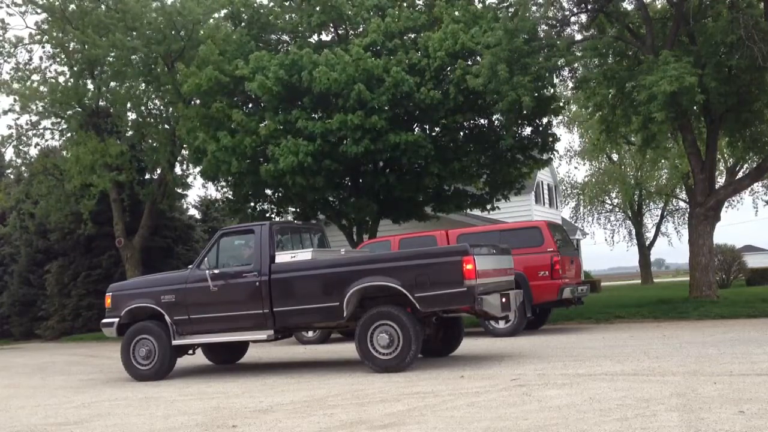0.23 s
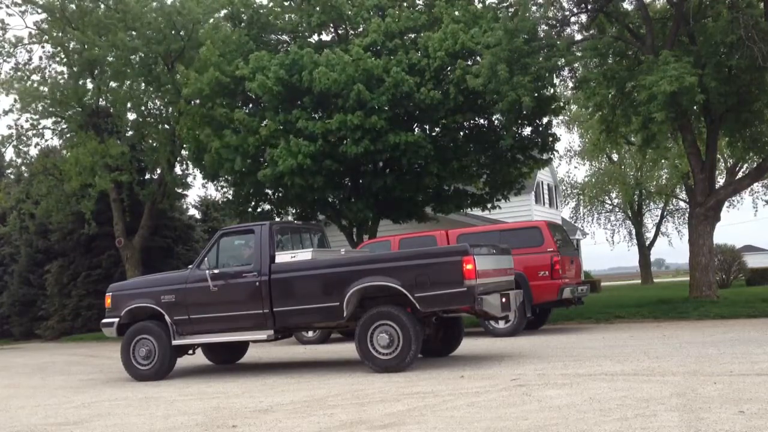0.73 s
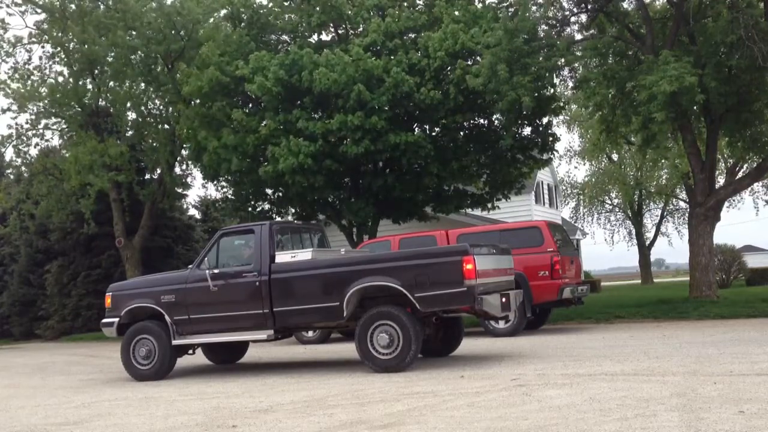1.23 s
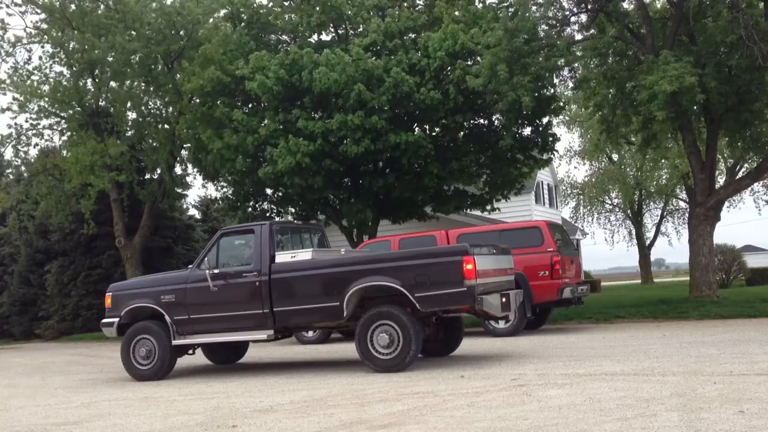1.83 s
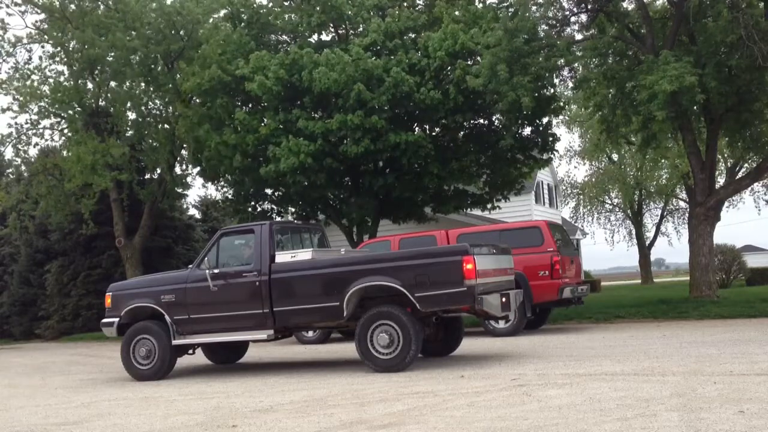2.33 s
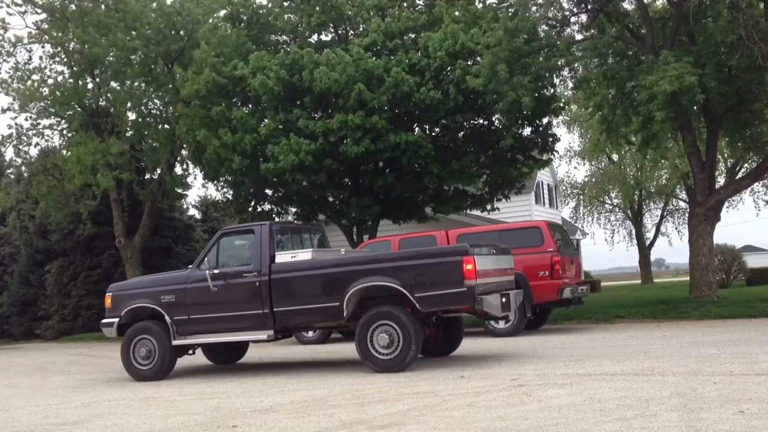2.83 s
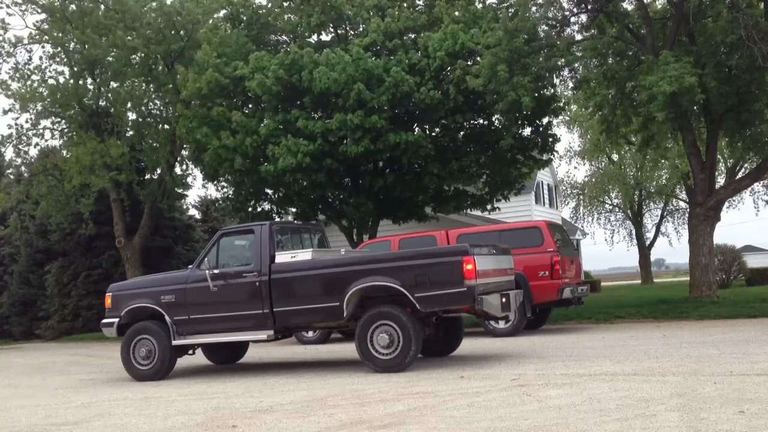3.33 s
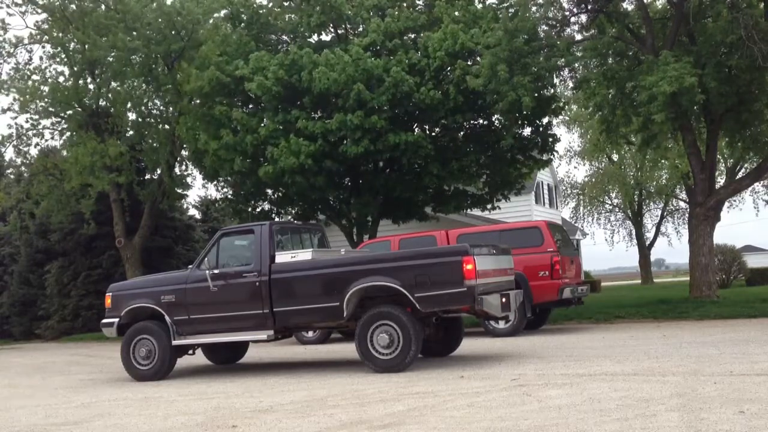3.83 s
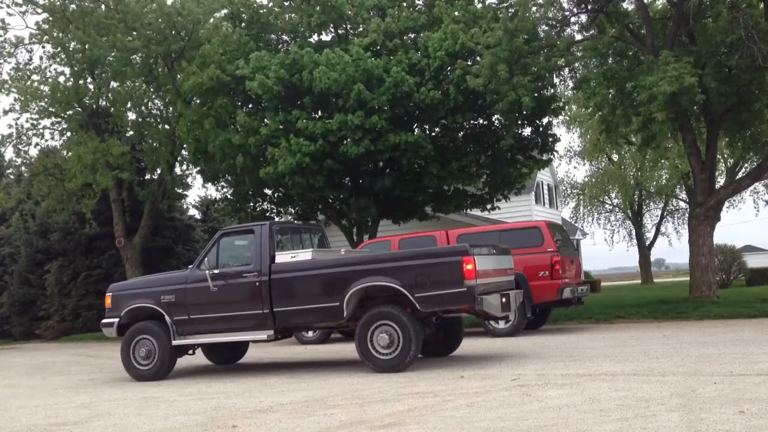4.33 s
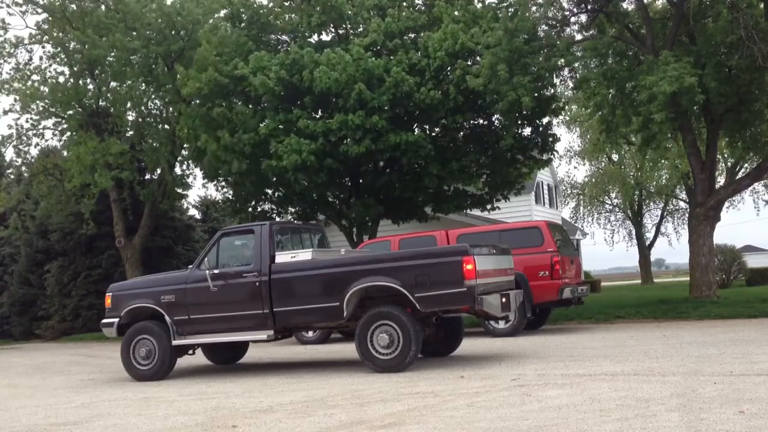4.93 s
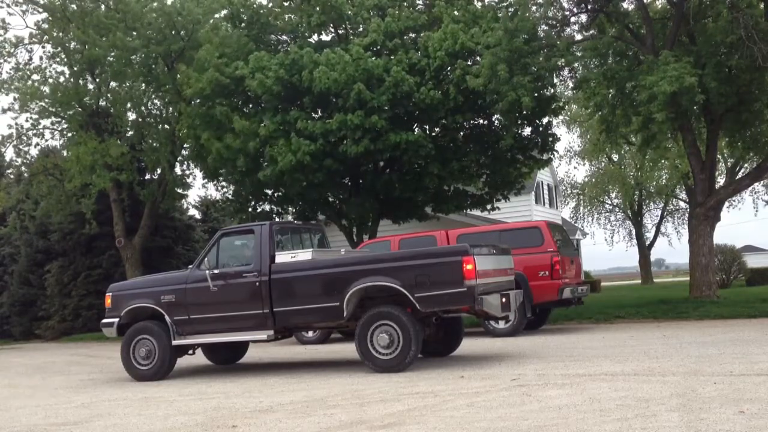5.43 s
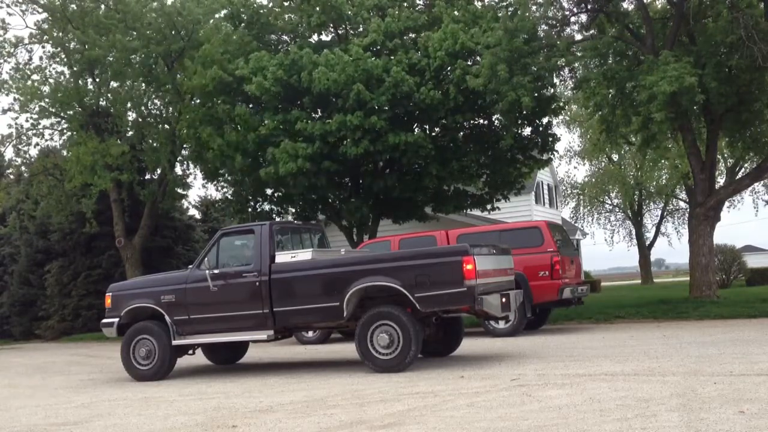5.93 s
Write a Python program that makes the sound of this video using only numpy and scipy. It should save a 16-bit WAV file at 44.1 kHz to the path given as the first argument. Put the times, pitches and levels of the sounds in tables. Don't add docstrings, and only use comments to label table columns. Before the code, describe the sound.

A parked petrol V8 with open twin straight pipes, outdoors in a farm yard. At 0 s it turns slowly and unevenly, lumpy thuds with faint metal flecks. Revs and loudness climb steadily, heavy thuds punching through around 1.4 to 2 s as separate blows merge into a wavering drone. At 2.4 s hard firings become sharp cracks and bright rasp, peaking near 2.6 s. The throttle snaps shut: dense machine-gun rattle and bright spits until about 3.3 s, then sparser pops and thuds while pitch falls. From 4.5 to 5.5 s it settles to a quiet, lumpy idle with fan hiss, valve ticks and loose metal. At 5.5 s an abrupt blip cracks and barks, dips near 6 s, and another hits at 6.1 s, cut off mid-rev. Short echoes from buildings and trees, slight breeze rumble, thin bass, limited peaks.

```python
import sys
import numpy as np
from scipy import signal
from scipy.fft import rfft, irfft, next_fast_len
from scipy.io import wavfile
from scipy.ndimage import uniform_filter1d, map_coordinates

SR = 44100
rng = np.random.default_rng(int(sys.argv[2]) if len(sys.argv) > 2 else 0)


def makeup_ratio(level_db):
    decades = np.asarray(level_db, float) / 20
    return 10 ** decades


def file_out(sig):
    cols = np.atleast_2d(sig).T
    lim = np.clip(cols, -1, 1)
    pcm = np.round(lim * 32767).astype(np.int16)
    wavfile.write(sys.argv[1], SR, pcm)


N = 273420

# (time [s], gas flow as bark level [dB], harshness as rasp level [dB])
EFFORT = [(0, -28, -43.5), (0.62, -19.5, -40), (1.35, -14, -35), (2.32, -14, -32), (2.42, -15, -23),
          (2.57, -15.5, -22.5), (2.63, -21, -25.5), (2.83, -19, -23.5), (2.95, -22.5, -31), (3.4, -21, -29),
          (3.7, -20.5, -37.5), (4.25, -19, -39), (5.5, -30, -45.5), (5.62, -17.5, -21.5),
          (5.87, -16.5, -27.5), (6.0, -27.5, -46), (6.11, -15, -40), (6.165, -11, -23)]
# (time [s], engine cycles per second [1/s])
SPEED = [(0, 8.52), (.47, 9.63), (1.33, 14.4), (1.81, 17.5), (2.23, 19.9), (2.42, 22.4), (2.59, 26.6),
         (2.73, 26.2), (3.04, 23.1), (3.32, 20.7), (3.83, 16), (4.49, 11.2), (5.45, 8), (5.6, 13),
         (5.7, 15.2), (5.86, 20.3), (6.08, 17.8), (6.2, 19.1)]
# (time [s], uneven burning [0-1], throttle [0-1])
BURN = [(0, .6, .7), (.5, .45, 1), (1.1, .25, 1), (2.1, .2, 1), (2.55, .25, 1), (2.65, .28, 0),
        (3.6, .38, 0), (4.4, .6, .2), (5.5, .7, .4), (5.6, .55, 1), (6.2, .5, 1)]
# (place in the firing order [0-7], level [dB])
NEAR_BANK = [(0, 2.5), (2, -2), (3, 0), (5, -3)]
# (frequency [Hz], width [Hz], level [dB])
COASTING = [(113, 82, -7), (165, 34.4, 5), (216, 105, 1), (299, 91, 0.5), (466.4, 46, -3.5)]
# (frequency [Hz], width [Hz], level [dB])
UPPER = [(558, 36.6, 5), (600, 23, 5), (656, 20.4, 5), (839.6, 53, 1.5), (1065, 33.5, -2), (1248, 61, -9),
         (1520, 230, -15.5)]
MID_HARSH_DB = -33
DULL_HZ = 2500


def unit(x):
    return x / np.sqrt(np.mean(x ** 2) + 1e-20)


def steady(x, span_s):
    return x / np.sqrt(np.abs(uniform_filter1d(x ** 2, int(span_s * SR))) + 1e-12)


def along(points, hz):
    f, v = np.transpose(points)
    return np.interp(np.log(hz + 1), np.log(f + 1), v)


def curves(rows):
    s, *cols = np.transpose(rows)
    return [np.interp(np.arange(N) / SR, s, c) for c in cols]


def filtered(x, response):
    m = next_fast_len(N + SR // 2)
    return irfft(rfft(x, m) * response(np.fft.rfftfreq(m, 1 / SR)), m)[:N]


def modes(table):
    def response(f):
        total = 0
        for k, (c, w, db) in enumerate(table):
            total = total + (-1) ** k * makeup_ratio(db) * 1j * f * w / (c * c - f * f + 1j * f * w)
        return total
    return response


def duller(top_hz):
    return lambda hz: 1 / (1 + 1j * hz / top_hz) ** 2


def wobble(rate):
    knots = rng.standard_normal(int(N * rate / SR) + 4)
    return map_coordinates(knots, [np.arange(N) * rate / SR])


def firings(bank, lag_s, scatter_db, jitter_s):
    cycles = np.cumsum(curves(SPEED)[0]) / SR
    now = np.arange(N)
    place, db = np.transpose(bank)
    turn = (np.arange(160)[:, None] + np.round(place) / 8).ravel()
    luck = rng.standard_normal((len(turn), 2))
    at = np.interp(turn + 0.0663, cycles, now, right=N - 1)
    rough = np.clip(np.interp(at, now, curves(BURN)[0]), 0, 1)
    at = np.clip(at + SR * (lag_s + jitter_s * rough * luck[:, 0]), 0, N - 1).astype(int)
    size = makeup_ratio(np.tile(db, len(turn) // len(db)) + scatter_db * rough * luck[:, 1])
    size = size * (turn < cycles[-1] - .06)
    return np.bincount(at, size, N)


def exhaust():
    # (place in the firing order [0-7], level [dB])
    far_bank = [(1, -7), (4, -3), (6, -6), (7, -4)]
    # (frequency [Hz], width [Hz], level [dB])
    loaded = [(121.5, 16, -8), (157, 39.7, 1.5), (195.6, 55, 1), (305, 69, -5), (451.5, 46.5, -7.5)]
    # (frequency [Hz], width [Hz], level [dB])
    idling = [(146.3, 62, -2), (228, 82, -2.5), (318, 33, -5.5), (447, 39.5, -10.5)]
    # (frequency [Hz], level per Hz [dB])
    jet_colour = [(760, 4.5), (1300, 0), (1760, -5.5), (2010, -1), (2190, -1), (3670, 0.5), (5390, -9.5),
                  (6440, -9), (8000, -19.5), (10600, -29), (12500, -25), (14600, -72), (15600, -71)]
    # (frequency [Hz], width [Hz], level [dB])
    tip = [(2000, 20, -18), (1980, 22, 1), (2740, 8.3, -24), (2890, 11, 10), (3350, 13, -24),
           (3860, 38, -15), (4150, 38, -5), (5360, 22, -4)]
    bark_db, rasp_db = curves(EFFORT)
    uneven, throttle = curves(BURN)
    speed = curves(SPEED)[0]
    idle = np.clip((15.5 - speed) / 6, 0, 1)

    upper_db = -28.5 + 0.63 * (bark_db + 16) + 0.21 * (rasp_db - MID_HARSH_DB) + 1.5 * wobble(9)
    upper_db = upper_db + np.minimum(speed - 15, 0)

    near = firings(NEAR_BANK, lag_s=0, scatter_db=5, jitter_s=.0013)
    far = firings(far_bank, lag_s=.0025, scatter_db=5, jitter_s=.0013)
    blows = near + far
    t = np.arange(SR // 8) / SR
    puff = signal.fftconvolve(blows, makeup_ratio(-60 * t / 0.11) - makeup_ratio(-60 * t / 0.012))[:N]

    def swirl():
        return steady(puff * rng.standard_normal(N), 0.17)

    def pipe(x):
        revving = throttle * filtered(x, modes(loaded)) + (1 - throttle) * filtered(x, modes(COASTING))
        return steady((1 - idle) * revving + idle * filtered(x, modes(idling)), 0.23)

    soft = filtered(blows, lambda hz: 1 / (1 + 1j * hz / 450))
    locked_share = .65
    bark = (1 - locked_share * (1 - idle)) * pipe(soft) + uneven * pipe(swirl())
    upper = 0.22 * steady(filtered(blows, modes(UPPER)), 0.18) + 3.6 * unit(filtered(swirl(), modes(UPPER)))

    jet = swirl() + 0.4 * rng.standard_normal(N)
    jet = filtered(jet, lambda hz: makeup_ratio(along(jet_colour, hz)) * (1 + modes(tip)(hz)))
    lucky = blows * makeup_ratio(3.5 * rng.exponential(size=N))
    bright = signal.butter(2, [6000, 14000], "band", fs=SR, output="sos")
    snap = steady(signal.sosfilt(bright, lucky), .3)
    jet = unit(jet) + .02 * throttle * (1 - idle) * snap

    lope_db = 1.1 * wobble(11)
    locked_db = -3.5 * throttle * (1 - idle) * (1 - uneven)
    out = makeup_ratio(bark_db + 2.1 + lope_db + locked_db) * steady(bark, 0.14)
    out = out + makeup_ratio(upper_db - 1.5) * steady(upper, 0.42)
    return out + makeup_ratio(rasp_db + 1.0 + 1.37 * wobble(17)) * jet


def orders():
    orders_loaded = (5, 7, 8, 9, 10, 11, 12, 13, 14, 15, 16)
    orders_coasting = (5, 6, 8, 9, 11, 13)
    # (level elsewhere [dB], best speed [1/s], range [1/s], gain there [dB])
    suits_loaded = [(-8, 24.5, 3, 4), (-14, 21, 3, 4), (-4, 20.4, .8, 6), (-7, 24, 2.6, 14), (-9, 18, 4, 1),
                    (-8, 18.6, 1.3, 9), (-12, 25, 2, 18), (-8, 15.7, 1.5, 14.5), (-12, 18.4, 1, 11),
                    (-13, 15, 1.5, 7), (-4, 18.8, 1.5, 11)]
    # (level elsewhere [dB], best speed [1/s], range [1/s], gain there [dB])
    suits_coasting = [(-8, 24, 2.5, 9), (-11, 19.5, 2.2, 12), (-2, 14.5, 2, 6), (-8, 26.3, 1.2, 10),
                      (-9, 16, 2.5, 4), (-13, 14, 2.2, 6)]
    # (frequency [Hz], level over the bark [dB])
    drone = [(45, -48), (90, -21), (125, -6.5), (160, -2), (200, -1.5), (240, -3), (290, -12), (350, -16)]
    speed = curves(SPEED)[0]
    uneven, throttle = curves(BURN)
    angle = 2 * np.pi * np.cumsum(speed) / SR
    base_db = curves(EFFORT)[0] - 11 * uneven

    def tone(k, db):
        level = np.sqrt(2) * makeup_ratio(db + 1.8 * wobble(10))
        return level * np.sin(k * angle + .25 * wobble(9) + rng.uniform(0, 2 * np.pi))

    def stack(multiples, suits):
        total = 0
        for k, (db, best, spread, gain_db) in zip(multiples, suits):
            suited_db = gain_db * np.exp(-((speed - best) / spread) ** 2)
            total = total + tone(k, base_db + db + suited_db + along(drone, k * speed))
        return total

    return throttle * stack(orders_loaded, suits_loaded) + (1 - throttle) * stack(orders_coasting, suits_coasting)


def engine_bay():
    # (frequency [Hz], level per Hz [dB])
    bay_colour = [(710, 9), (1200, -30), (1860, -9), (2280, -2), (3860, -2.5), (4250, 1.5), (6670, -1.5),
                  (11600, -18.5), (12600, -22), (14400, -31), (15600, -40)]
    hiss = unit(filtered(rng.standard_normal(N), lambda hz: makeup_ratio(along(bay_colour, hz))))
    fan = makeup_ratio(-42)
    leaks = makeup_ratio(-50 + 2.36 * (curves(EFFORT)[1] - MID_HARSH_DB))
    fade = makeup_ratio(-60 * np.arange(SR // 10) / SR / 0.046)
    ticks = signal.fftconvolve(firings(NEAR_BANK, lag_s=0, scatter_db=6, jitter_s=.002), fade)[:N]
    ticks = steady(ticks * rng.standard_normal(N), 0.57)
    metal = modes([(6700, 5000, 0)])
    valves = unit(filtered(ticks, lambda hz: metal(hz) / (1 + (hz / 11000) ** 8)))
    throb = makeup_ratio(0.28 * wobble(3.24) + 1.8 * wobble(5.7))
    return np.hypot(fan, leaks) * throb * hiss + makeup_ratio(-49 - 11 * curves(BURN)[1]) * valves


def thuds():
    # (time [s], peak level [dB], centre frequency [Hz])
    heavy = [(0.088, -16, 188), (0.248, -12, 221), (0.302, -12, 180), (0.331, -10, 183), (0.429, -13, 205),
             (0.511, -11, 213), (0.607, -6, 191), (0.67, -9, 191), (0.723, -11, 218), (0.761, -8, 288),
             (0.884, -7, 205), (0.968, -5, 210), (1.083, -7, 170), (1.176, -5, 183), (1.213, -9, 191),
             (1.406, -1, 188), (1.699, -6, 229), (1.899, -3, 205), (1.949, -3, 307), (1.999, -3, 202),
             (3.011, -9, 256), (3.029, -11, 425), (3.057, -9, 266), (3.098, -7, 188), (3.236, -9, 436),
             (3.259, -7, 460), (3.284, -6, 172), (3.309, -6, 301), (3.335, -6, 293), (3.356, -8, 439),
             (3.458, -10, 175), (3.489, -11, 151), (3.595, -5, 215), (3.734, -8, 194), (3.851, -11, 210),
             (3.928, -8, 188), (3.958, -6, 275), (4.095, -9, 161), (4.165, -6, 202), (4.256, -11, 188),
             (4.419, -11, 170), (4.546, -14, 207), (4.673, -10, 218), (4.721, -14, 266), (4.865, -14, 240),
             (5.657, -4, 250), (5.769, -5, 207), (5.897, -8, 213), (6.03, -12, 234), (6.113, -4, 178),
             (0.568, -11, 167), (2.599, -6, 215), (4.364, -13, 218), (4.836, -16, 161), (5.609, -8, 148)]
    out, bites = np.zeros(N + SR), np.zeros(N)
    t = np.arange(SR // 16) / SR
    for s, db, hz in heavy:
        at = round(s * SR)
        angle = 2 * np.pi * hz * t * (0.952 + 8 * t)
        swing = np.sin(angle) + makeup_ratio(-9) * np.sin(rng.uniform(1.6, 2.5) * angle)
        fade = makeup_ratio(db - 2 - 60 * t * hz / 7)
        out[at:][:len(t)] += fade * (1 - np.exp(-t / 0.0005)) * swing
        bites[at] = makeup_ratio(db + 3)
    return out[:N] + filtered(filtered(bites, modes(UPPER)), duller(DULL_HZ))


def shocks():
    # (time [s], peak level [dB], centre frequency [Hz])
    flecks_early = [(0.115, -23, 3370), (0.203, -25, 3340), (0.254, -24, 2730), (0.2855, -17.5, 4700),
                    (0.302, -23, 3270), (0.3324, -23, 2820), (0.376, -17, 3280), (0.406, -19, 2850),
                    (0.485, -30, 2950), (0.5106, -19, 2260), (0.5862, -31, 3400), (0.6094, -24, 2300)]
    # (time [s], peak level [dB], centre frequency [Hz])
    hard = [(2.3993, -6, 2690), (2.4209, -2.5, 3700), (2.4703, -4, 3770), (2.4962, -1.5, 3820),
            (2.5122, 3, 3370), (2.5524, 4, 3150), (2.589, 0.5, 3650), (2.6334, 0, 3800),
            (2.6912, -4.5, 2840), (2.7059, -4, 3650), (5.5283, -21, 2070), (5.5493, -9, 3380),
            (5.5774, 2.5, 4600), (5.6076, -10, 3100), (5.6195, 0.5, 2800), (5.6785, 4, 3040),
            (5.7074, -4, 3080), (5.737, -2, 3320), (5.7538, 0, 2970), (5.8057, 0.5, 3700),
            (5.843, -1.5, 6000), (5.8666, -0.5, 3820), (6.13, -5, 2900), (6.149, 3.5, 3700),
            (6.186, 0.5, 3120)]
    # (time [s], peak level [dB], centre frequency [Hz])
    rattle = [(2.7214, -5, 3740), (2.7302, -4, 3800), (2.7584, -11, 2150), (2.768, 2.5, 4200),
              (2.7824, -19, 3470), (2.7977, -11, 3650), (2.8074, 1, 3900), (2.822, -18, 3410),
              (2.847, 0, 4300), (2.861, -9, 3500), (2.8778, -10, 4430), (2.8866, -4.5, 3250),
              (2.928, -2.5, 4000), (2.9441, -5, 3590), (2.97, 1.5, 4000), (2.9861, -7, 3500),
              (3.0131, -3.5, 3750), (3.03, -10, 4720), (3.056, -3, 2520), (3.072, -13, 1970),
              (3.1003, -0.5, 3900), (3.116, -1.5, 4530), (3.1448, -0.5, 3120), (3.161, -4, 6500),
              (3.1724, -6, 2570), (3.1888, -1, 2500), (3.2055, -6.5, 2620), (3.2178, -10, 3740),
              (3.237, -5.5, 3430), (3.2534, -6, 3530), (3.2834, -7, 3130), (3.3009, -10, 3570),
              (3.3797, -32, 3670), (3.438, -33, 4080)]
    # (time [s], peak level [dB], centre frequency [Hz])
    pops = [(3.3237, -5.5, 4030), (3.357, -2.5, 3980), (3.4073, -10, 2600), (3.458, -2, 3800),
            (3.49, -8, 3900), (3.509, -11, 2330), (3.598, -13, 2460), (3.6183, -13, 3950),
            (3.6548, -11, 2300), (3.734, -12.5, 6300), (3.308, -6.5, 2000), (3.96, -18.5, 3050),
            (3.987, -14, 4080), (4.072, -15.5, 3950), (4.143, -14.5, 4200), (4.218, -13.5, 4100),
            (4.3768, -12, 4100), (4.55, -13, 4100), (5.0776, -22, 4100)]
    # (time [s], peak level [dB], centre frequency [Hz])
    flecks_late = [(4.586, -22, 6780), (4.6407, -24.5, 4200), (4.6767, -41, 4550), (4.715, -23.5, 3870),
                   (4.7794, -25, 4440), (4.8133, -28, 3870), (4.8498, -29, 5560), (4.9213, -19.5, 6740),
                   (5.005, -24, 6550), (5.036, -25, 6160), (5.0727, -19, 3870), (5.126, -28, 4300),
                   (5.171, -28, 3170), (5.2545, -29, 3180), (5.2948, -24, 6800), (5.342, -26, 4120)]
    rattle = np.add(rattle, [0, -0.5, 0])
    cycles, t = np.cumsum(curves(SPEED)[0]) / SR, np.arange(N) / SR
    count = int(cycles[-1]) - 1
    luck = np.clip(rng.standard_normal((count, 2)), -2, .8)
    place = rng.integers(0, 8, count) / 8
    s = np.interp(np.arange(count) + place, cycles, t)
    db = np.interp(s, t, curves(EFFORT)[1]) + 7.5 + 12 * luck[:, 0]
    stray = np.c_[s, db, 2950 * np.exp(.18 * luck[:, 1])]
    return np.r_[hard, pops, flecks_early, flecks_late, rattle, stray]


def cracks():
    # (frequency [Hz], width [Hz], level [dB])
    mouth = [(2300, 2100, 0.5), (4100, 1660, 5.5), (6550, 1390, 4), (11000, 3000, -13)]
    rings, fizz, thumps = np.zeros(N + SR), np.zeros(N + SR), np.zeros(N)
    t = np.arange(SR // 20) / SR
    throttle = curves(BURN)[1]
    for s, db, hz in shocks():
        at = round((s + .001) * SR)
        sharp = np.clip((db + 26) / 18, .15, 1)
        rise = makeup_ratio(db) * (1 - np.exp(-t / 0.00025))
        ring = np.sin(2 * np.pi * hz * t) * makeup_ratio(-60 * t / (.013 - .009 * sharp))
        rings[at:][:len(t)] += .8 * rise * ring
        front = 1.31 * (1 - 0.55 * throttle[at]) * sharp * makeup_ratio(-60 * t / 0.0042)
        chuff = (0.12 + 0.3 * (1 - sharp)) * makeup_ratio(-60 * t / 0.07)
        fizz[at:][:len(t)] += rise * (front + chuff) * rng.standard_normal(len(t))
        thumps[at] = makeup_ratio(db + 13.0)
    shock = rings[:N] + filtered(filtered(fizz[:N], modes(mouth)), duller(11700))
    ground = .22 * np.pad(shock, (round(.0011 * SR), 0))[:N]
    return shock + ground + filtered(filtered(thumps, modes(COASTING + UPPER)), duller(DULL_HZ))


def breeze():
    # (time [s], peak level [dB])
    gusts = [(.45, -44), (1.33, -36), (2.0, -54), (2.43, -34), (2.78, -53), (3.2, -40), (3.75, -46),
             (4.06, -43), (4.51, -55), (5.63, -36), (5.87, -54), (6.18, -38)]
    low = filtered(rng.standard_normal(N), lambda hz: 1 / (1 + (hz / 70) ** 4) * (hz / (hz + 25)) ** 2)
    t = np.arange(N) / SR
    level = makeup_ratio(-96)
    for s, db in gusts:
        level = level + makeup_ratio(db + np.minimum(128 * (t - s), 97 * (s - t)))
    return level * unit(low * makeup_ratio(4 * wobble(12)))


def spits():
    # (time [s], peak level [dB])
    spits_first = [(2.4262, -36), (2.4696, -17), (2.496, -26), (2.512, -16), (2.5519, -15), (2.5903, -22),
                   (2.6347, -22), (2.6926, -22), (2.722, -20), (2.7594, -19), (2.7983, -12.5),
                   (2.8482, -14), (2.8776, -19), (2.9445, -22), (2.9709, -28), (2.9869, -21), (3.0133, -23),
                   (3.0298, -19), (3.0562, -26), (3.0727, -21), (3.1006, -26), (3.1171, -25), (3.145, -23),
                   (3.1615, -20), (3.1894, -27), (3.2069, -16), (3.2343, -24), (3.2533, -19), (3.2822, -25),
                   (3.3241, -29), (3.357, -25), (3.38, -29), (3.4069, -34), (3.4583, -25), (3.4912, -39),
                   (3.5556, -44), (3.583, -42), (3.6189, -33), (3.6544, -39), (3.6963, -31), (3.7342, -36),
                   (3.7546, -36), (3.8449, -45), (3.8724, -40), (3.9866, -41), (4.0111, -44), (4.0565, -42),
                   (4.0724, -44), (4.1263, -37), (4.2765, -38), (4.3543, -42), (4.3777, -36), (4.4955, -43),
                   (4.5508, -23), (4.716, -45)]
    # (time [s], peak level [dB])
    spits_later = [(5.5772, -39), (5.5772, -42), (5.6056, -31), (5.6505, -29), (5.6754, -24), (5.7094, -26),
                   (5.7378, -17), (5.8051, -18), (5.8435, -25), (5.8665, -14), (6.1489, -21), (6.1853, -17)]
    out, t = np.zeros(N + SR), np.arange(SR // 40) / SR
    for s, db in np.r_[spits_first, spits_later]:
        shape = makeup_ratio(db - 4 - 60 * t / .011) * (1 - np.exp(-t / 0.00035))
        out[round(s * SR):][:len(t)] += shape * rng.standard_normal(len(t))
    edge = modes([(10600, 6000, 3)])
    return filtered(out[:N], lambda hz: edge(hz) ** 2)


def yard(x):
    # (frequency [Hz], time to fall 60 dB [s])
    fading = [(150, 0.38), (1000, 0.094), (8000, 0.081)]
    hz, t, z = signal.stft(rng.standard_normal(SR // 2), SR, nperseg=256)
    tail = signal.istft(z * makeup_ratio(-60 * t / along(fading, hz)[:, None]), SR, nperseg=256)[1]
    return signal.fftconvolve(np.pad(x, (400, 0)), tail / np.linalg.norm(tail))[:N]


def scene():
    blast = exhaust() + cracks() + spits() + thuds()
    echoes = makeup_ratio(-10.5) * yard(blast)
    heard = filtered(blast + echoes, lambda hz: (1j * hz / (90 + 1j * hz)) ** 4)
    return (heard + orders() + engine_bay() + breeze())[None]


def roll_off(x):
    return signal.sosfilt(signal.butter(12, 15710, fs=SR, output="sos"), x)


def record(dry):
    held = dry[0] / (1 + np.abs(dry[0] / .68) ** 8) ** (1 / 8)
    mix = filtered(held, lambda hz: (hz < 15400) * hz ** 2 / (hz ** 2 + 35 ** 2))[None]
    return roll_off(mix)


dry = scene()
out = record(dry)
file_out(out)
```